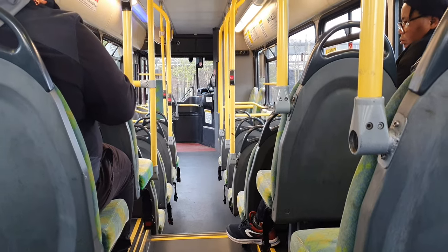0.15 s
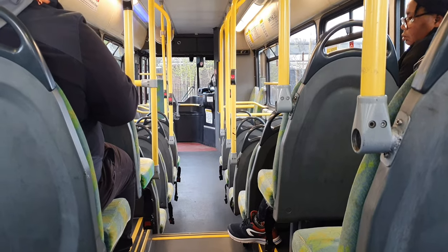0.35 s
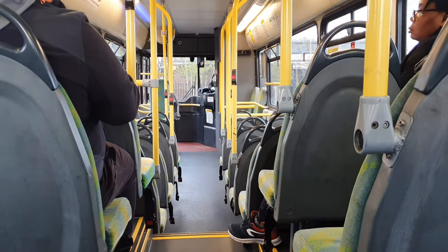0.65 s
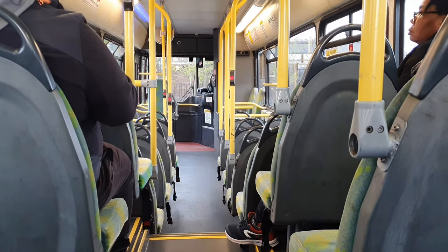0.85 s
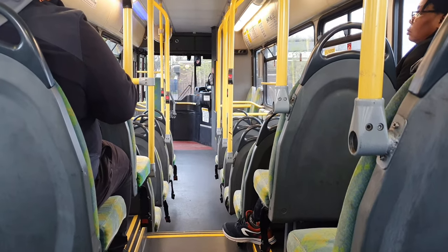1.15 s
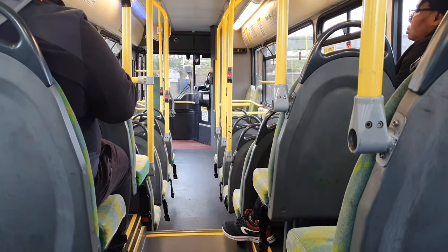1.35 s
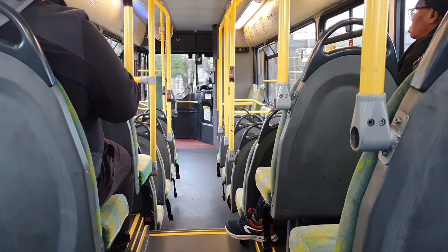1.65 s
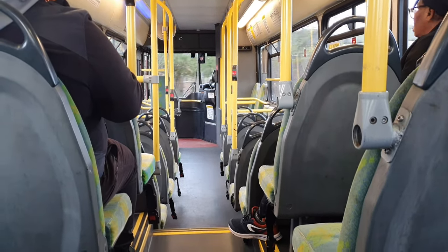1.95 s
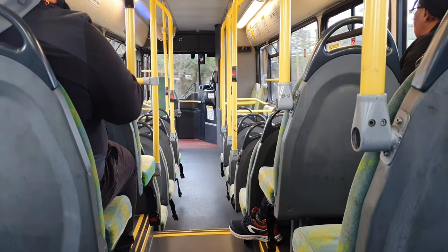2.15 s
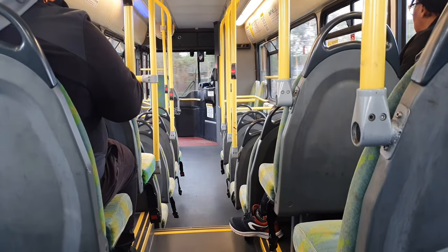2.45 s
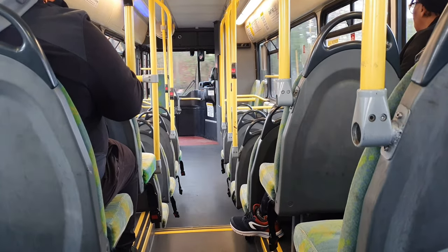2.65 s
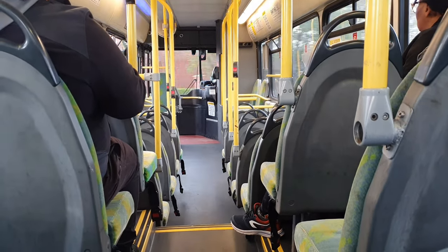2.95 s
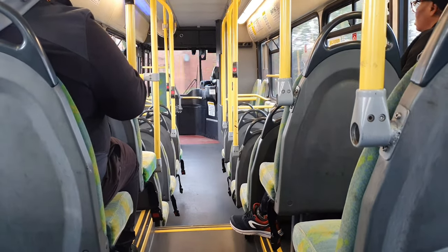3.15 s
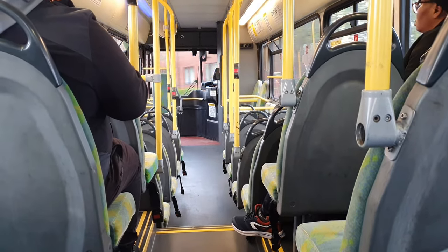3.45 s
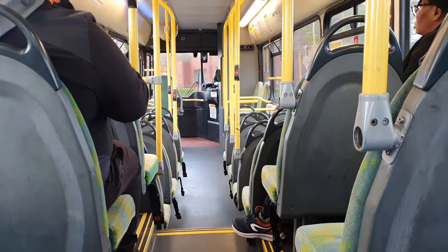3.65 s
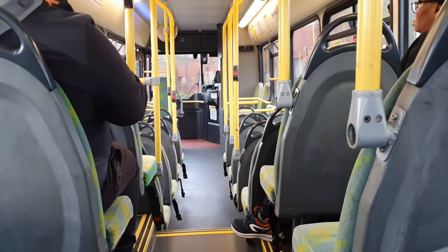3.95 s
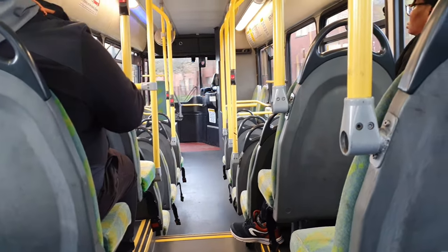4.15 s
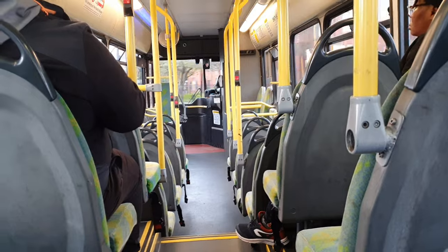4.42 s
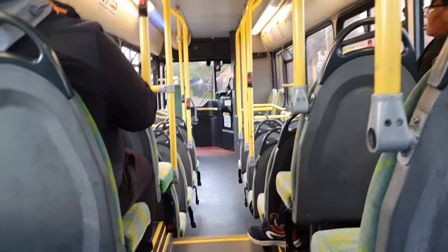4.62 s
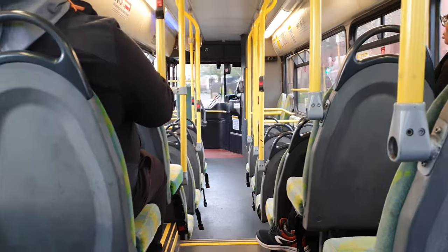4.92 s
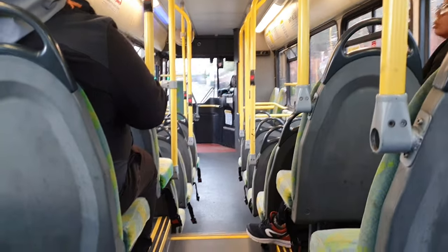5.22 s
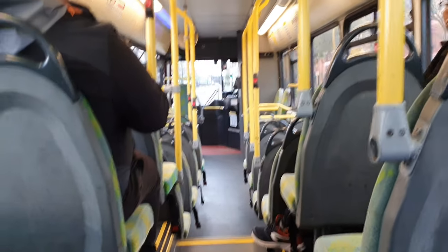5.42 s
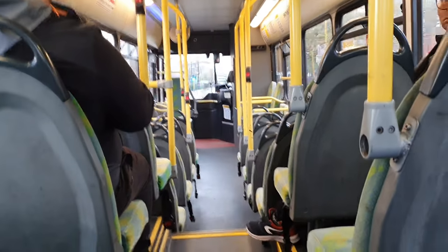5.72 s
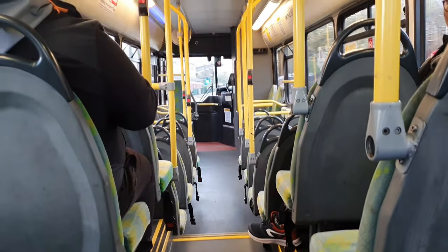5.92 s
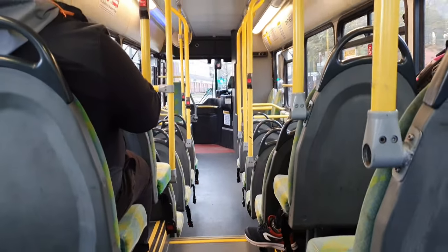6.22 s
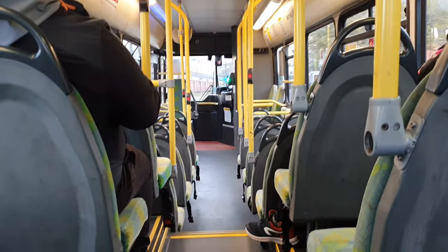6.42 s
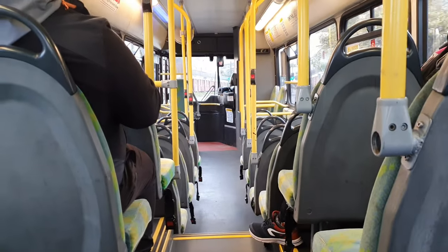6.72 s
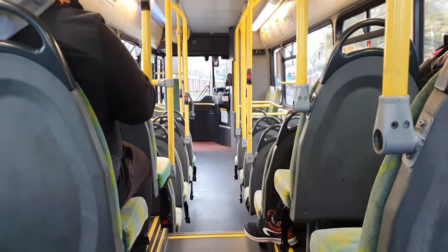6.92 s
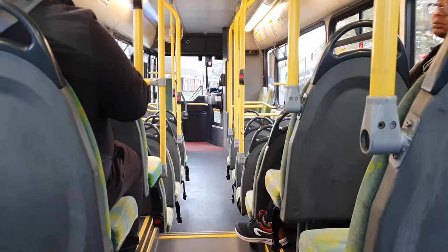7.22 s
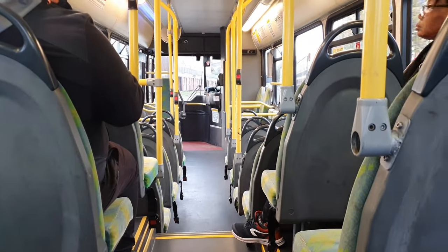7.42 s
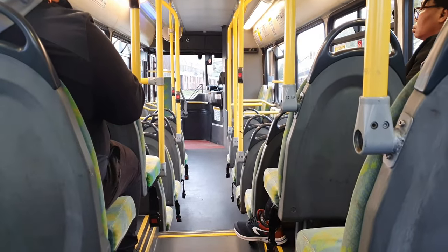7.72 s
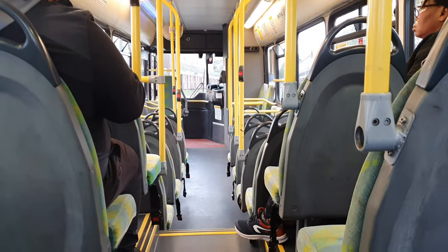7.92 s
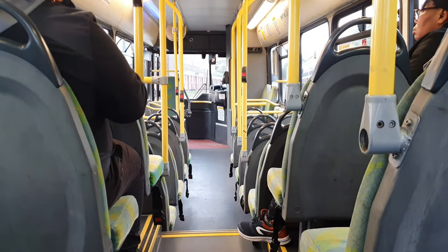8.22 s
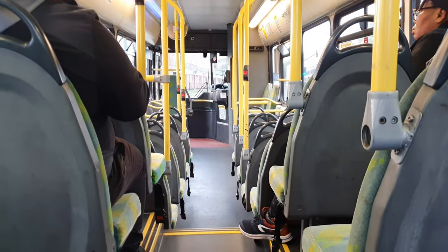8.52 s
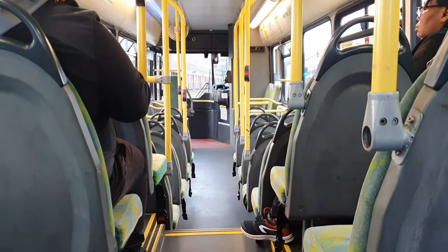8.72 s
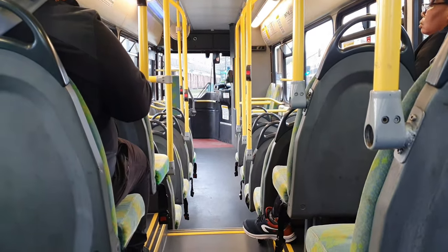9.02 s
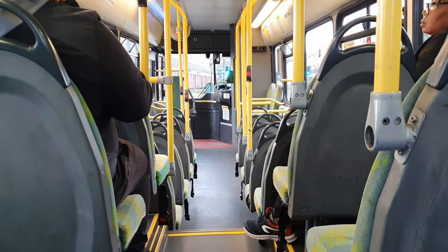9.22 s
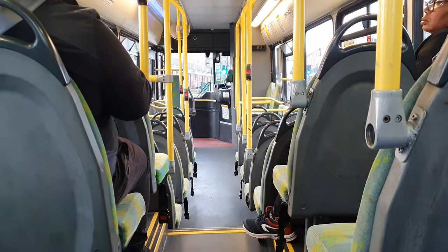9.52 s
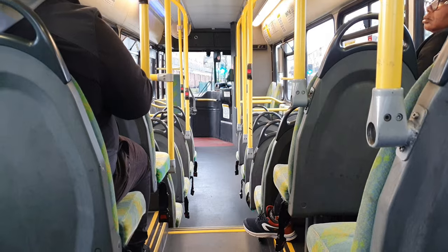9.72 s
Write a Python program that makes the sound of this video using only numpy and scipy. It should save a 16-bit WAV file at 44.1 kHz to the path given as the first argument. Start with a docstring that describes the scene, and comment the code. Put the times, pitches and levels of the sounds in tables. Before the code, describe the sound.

A diesel bus is heard from inside the cabin, close to the engine. Right at the start it pulls away, its deep drone rising quickly over the first second, with knocking, light valve ticking and a thin gear whine above continuous road rumble. The pitch holds until about 2.7 seconds, then climbs again to a peak near 4.4 seconds, making the cabin boom. The bus then cruises, the engine softening a little, with a very faint high turbo whistle. At about 5.8 seconds there is a low bump and a loose fitting chatters briefly on the left. Small ticks from trim and rails are scattered throughout. Around 8 seconds the engine eases off and its pitch falls, then it revs up again by 9 seconds. Another low bump follows, and the engine settles slightly lower with a clearer whine until about 10 seconds.

```python
"""Riding in a diesel bus

Near its six-cylinder engine, we hear a bus pull away, hold its speed, ease off and pick up again.
The firing makes the cabin boom. Cylinders knock, valves tap and gears whine in step with the revs
(the engine's speed), over the rumble of the road. A faint turbo whistles and loose fittings rattle."""
import sys
import numpy as np
from scipy import signal
from scipy.fft import rfft, irfft
from scipy.io import wavfile
from scipy.ndimage import uniform_filter1d

SR = 44100
rng = np.random.default_rng(int(sys.argv[2]) if len(sys.argv) > 2 else 0)


def transcribe(u):
    """Save the signal u as a 16-bit wav file named by the first command-line argument.

    u: samples, shape (n,) or (channels, n), limited to [-1, 1]; the rate is SR.
    q: integer samples, one column per channel.
    """
    v = np.clip(np.atleast_2d(u).T, -1, 1)
    q = np.round(v * 32767).astype(np.int16)
    wavfile.write(sys.argv[1], SR, q)


N = 434812
T = np.arange(N) / SR

# how hard the engine pulls: (time [s], level against full pull [dB])
LOAD = [(0.0, -15.5), (0.14, 0.3), (0.3, -1.5), (0.48, -0.6), (1.25, 0.8), (1.9, -0.4), (2.85, -1.5),
        (3.1, 1.8), (4.5, -1), (5.7, -3), (6.2, -6), (7.1, -5.5), (7.9, -1.5), (8.25, -17), (8.8, -11),
        (9.15, -1), (9.86, -1.1)]
# how the two sides differ: (frequency [Hz], likeness [0-1], left's lead [rad], left minus right [dB])
STEREO = [(45, 1, -0.94, 0.5), (74, 0.9, 0.63, -3.5), (87, 0.88, 0.94, 0.5), (96, 1, 0.54, 1.1),
          (190, 0.99, 0.19, 1), (300, 0.95, 0.09, 2.5), (450, 0.47, 0.44, 1.5), (556, 0.1, 1, 4.5),
          (1190, 0.1, 1.5, 2.5), (1600, 0.66, 2.5, 1.5), (2500, 0.2, 1, 6), (4150, 0, 0, 10),
          (8000, 0.43, 2.5, 4), (15000, 0.4, -2, 3)]


def drone(firings, hz, firing_db=-22.0, octave_db=-25.5):
    """The firing hums with many overtones, which swell as the revs carry them through a cabin boom."""
    # booms and dead spots of the cabin: (frequency [Hz], width [Hz], lift [dB])
    booms = [(42.6, 5.4, 7.5), (66, 6, 5), (96.4, 36, 5.5), (145, 12, 6.5), (149.9, 5.2, -10),
             (198, 15.4, 10.5), (307, 14, 10.5), (356.4, 27, 6.5), (552, 66, 6.5), (856, 220, 6.5),
             (1110, 390, -4)]
    # weaker tones of shafts and belts:
    # (multiple of the firing rate, level [dB], change per octave of revs [dB], boom strength [factor])
    overtones = [(0.6667, -40, -7, 2.5), (2.2, -30, -11, .1), (2.6667, -39, -12, .3), (2.75, -34.5, 19, .3),
                 (3, -41, -24, 1.4), (4, -41, -12, .9), (4.125, -42, -16, .4), (4.3333, -46, 3, .3),
                 (5, -49, -14, 1.8), (5.3333, -49, -6, .6), (5.6667, -49, 10, .7), (6, -48, -13, .6),
                 (7, -52, -12, 1), (7.3333, -57, -22, 1), (8, -52, 10, 1), (10, -59, -8, 1),
                 (11, -60, -12, .6), (12, -51, -7, 1), (30, -65, -14, 0)]
    load_db, = curves(LOAD)
    coasting, revs, labouring = engine_state(hz)
    rev_change = abs(uniform_filter1d(np.gradient(hz, T), size=6000))
    dip_db = -5 * uniform_filter1d(np.tanh(rev_change / 30), size=12000)  # fast change dims the octave
    out = tone(firings, hz, firing_db + load_db + lift(booms, hz), flutter=0.088, flutter_hz=2.0)
    level_db = octave_db + load_db + lift(booms, 2 * hz) + dip_db
    out += tone(2 * firings, 2 * hz, level_db, flutter=0.081, flutter_hz=9.3)
    effort_db = 0.8 - 12 * coasting - 8 * labouring
    for multiple, db, rise_db, strength in overtones:
        boom_db = strength * np.interp(T, T[::100], lift(booms, multiple * hz[::100]))
        level_db = db + rise_db * revs + effort_db + boom_db
        shake = min(.22 + .018 * multiple, .8)  # uneven running shakes the higher tones more
        cycles = multiple * firings + rng.random()
        out += tone(cycles, multiple * hz, level_db, flutter=shake, flutter_hz=3 + .45 * multiple)
    return out


def knock(firings, cylinders=6, ring_s=0.089, jitter_s=.00007, uneven_db=1.2):
    """Each cylinder in turn strikes the engine block and rings it in its own way."""
    fired_s = T[1:][np.diff(np.floor(firings)) > 0]
    slip, force = rng.standard_normal((len(fired_s), 2)).T
    at = np.clip((fired_s + jitter_s * slip) * SR, 0, N - 1).astype(int)
    t, out = T[:SR // 6], np.zeros((2, N))
    for cylinder in range(cylinders):
        blows = np.zeros(N)
        blows[at[cylinder::cylinders]] = amp(uneven_db * force[cylinder::cylinders])
        ring = rng.standard_normal((2, len(t))) * amp(-60 * t / ring_s)
        out += signal.oaconvolve(blows[None], ring, axes=1)[:, :N]
    return unit(out)


def valves(firings, hz, tight_db=-8, uneven_db=3, fade_above_hz=88):
    """Valves tap the engine cover, a slack one in six hardest; coasting or high revs soften them."""
    # the cover's ringing notes: (pitch [Hz], level [dB], time to fade by 60 dB [s])
    cover = [(1515, -2, 0.073), (1562, 0.5, 0.049), (1560, -8.5, 0.098)]
    at = np.flatnonzero(np.diff(np.floor(firings)) > 0)
    force, slip = rng.standard_normal((len(at), 2)).T
    is_tight = np.arange(len(at)) % 6 > 0
    taps = np.zeros(N)
    taps[np.clip(at + (20 * slip).astype(int), 0, N - 1)] = amp(uneven_db * force + tight_db * is_tight)
    t = T[:SR // 4]
    lag, side = np.array([[0], [2.1]]), np.array([[1], [.7]])  # the right side is later and softer
    ring = sum(amp(db - 60 * t / fade_s) * np.sin(2 * np.pi * (pitch * t + rng.random()) - lag)
               for pitch, db, fade_s in cover)
    ring = side * ring * (1 - np.exp(-t / 0.0037))  # the cabin takes a moment to fill
    coasting = engine_state(hz)[0]
    level_db = -44 - 10 * coasting - .5 * np.maximum(hz - fade_above_hz, 0)
    return unit(signal.oaconvolve(taps[None], ring, axes=1)[:, :N]) * amp(level_db)


def gears(firings, hz, coarse=24, fine=36, swell_db=0.7):
    """Two sets of timing gears whine as their teeth meet, 24 and 36 times a firing."""
    # whine of the coarse gears: (time [s], level [dB])
    whine = [(.15, -62), (.5, -44), (1.05, -49), (1.45, -44), (2.6, -45), (3.0, -50), (3.36, -38),
             (3.9, -45), (4.35, -41.5), (5, -54), (6.8, -55), (7.55, -43), (8.15, -49), (8.42, -64),
             (8.66, -44.5), (9.05, -42), (9.25, -44), (9.45, -38.5), (9.86, -38.5)]
    # ring of the gear housing, which the fine gears sweep through: (frequency [Hz], width [Hz], lift [dB])
    housing = [(2260, 480, 19)]
    crank = 2 * np.pi * firings / 3
    sway = .4 * (np.sin(crank) + np.sin(crank / 2)) / (2 * np.pi)  # the crankshaft turns unevenly
    out = tone(coarse * firings + sway, coarse * hz, curves(whine)[0], flutter=.45, flutter_hz=24)
    fine_db = -67 + lift(housing, fine * hz)
    out += tone(fine * firings + sway, fine * hz, fine_db, flutter=0.89, flutter_hz=41)
    return out * amp(swell_db * wander(7))


def cabin(firings, firing_hz, throb=0.057, shimmer_db=0.8):
    """Knock and the rushing noise of engine and road reach the seats through floor and panels."""
    # how much of the noise is knock: (frequency [Hz], share [0-1])
    knock_share = [(130, .05), (300, .45), (550, .42), (850, .2), (1500, .2), (7000, .12)]
    # tone colour of the noise in the cabin: (frequency [Hz], level in a 1 Hz band [dB])
    colour = [(15, -71), (40, -49.5), (100, -49), (190, -48), (300, -56), (450, -60), (700, -68),
              (1200, -73.5), (2600, -78), (4700, -87), (6700, -92.5), (7800, -101.6), (12000, -99),
              (15500, -103.6)]
    # ringing panels: (frequency [Hz], width [Hz], lift [dB])
    panels = [(73, 5, 1), (473, 55, 0.5), (564, 12, 2), (736, 50, -7.5), (774, 18, 6), (780, 260, 1.5),
              (1070, 280, -2), (1558, 95, 6.5), (2335, 220, 2.5), (3460, 580, 2.5), (4550, 250, 2.5)]
    rush = rng.standard_normal((2, N)) * (1 + throb * np.cos(2 * np.pi * firings))
    rush = unit(rush * amp(shimmer_db * wander(22)))
    frames = dict(fs=SR, nperseg=4096, noverlap=3072)
    hz, t, (rushing, knocking) = signal.stft(np.array([rush, knock(firings)]), **frames)
    share = spectra(knock_share, hz)[0][:, None]
    left, other = np.sqrt(1 - share) * rushing + np.sqrt(share) * knocking
    same, lead, tilt_db = (c[:, None] for c in spectra(STEREO, hz))
    right = (same * left + np.sqrt(1 - same ** 2) * other) * np.exp(-1j * lead)
    pair = np.array([left * amp(tilt_db), right]) * np.sqrt(2 / (1 + amp(tilt_db) ** 2))
    colour_db = spectra(colour, hz)[0] + lift(panels, hz)
    pair *= amp(colour_db[:, None] + noise_swell(firing_hz, hz, t)) * np.sqrt(SR / 2)
    return signal.istft(pair, **frames)[1][:, :N]


def noise_swell(firing_hz, hz, t, hiss_hz=4000):
    """Decibels added to the cabin noise by frequency and time, as pull, revs and road bumps change it."""
    # rumble, drumming and clatter: (centre [Hz], lift at full pull [dB], change when coasting [dB],
    # change per octave of revs [dB], change per octave of labouring [dB])
    bands = [(50, 2.5, 3.5, -2, 7.5), (203, -0.35, 1, 0.5, 0), (900, 1.7, -7.5, 1, 0.5)]
    # bumps in the road: (time [s], lift [dB], half-length [s])
    bumps = [(.16, 2, 0.12), (0.517, -6, 0.07), (1.1, 4, .1), (4.498, 5, .3), (5.767, 11, 0.058),
             (9.164, 10.5, 0.15)]
    # the hiss above the clatter: (time [s], lift [dB])
    hiss = [(0, -7.5), (.35, 1), (.6, -1), (2.5, -4), (3.6, 1.5), (5.75, 1.5), (6.15, -1.3), (7.1, -2),
            (7.6, 0), (8.15, -2.5), (8.55, -5.5), (9.25, 0), (9.86, 0)]
    coasting, revs, labouring = engine_state(np.interp(t, T, firing_hz), t)
    rumble, drumming, clatter = (db + coast_db * coasting + rise_db * revs + labour_db * labouring
                                 for _, db, coast_db, rise_db, labour_db in bands)
    rumble += sum(db * np.exp(-((t - s) / length) ** 2) for s, db, length in bumps)
    levels = [rumble, drumming, clatter, curves(hiss, t)[0]]
    centres = np.log([band[0] for band in bands] + [hiss_hz])
    blends = [np.interp(np.log(hz + 1), centres, band) for band in np.eye(len(levels))]
    return sum(np.outer(blend, level) for blend, level in zip(blends, levels))


def fittings():
    """A loose fitting chatters, and trim and rails tick, mostly on the left."""
    # the chatter and the ticks, each: (start [s], level [dB], length [s])
    chatter = [(5.774, -41, .06), (5.838, -45, .07), (5.916, -48, .03), (5.974, -37, .045)]
    ticks = [(.318, -54, .04), (.39, -56, .04), (.6, -54, .04), (1.238, -59, .03), (2.73, -59, .05),
             (3.324, -56, 0.027), (5.297, -56, .09), (6.655, -53, .025), (7.66, -60, .04), (8.11, -60, .04),
             (8.57, -54, .03), (9, -58, .03), (9.277, -54, .035)]
    # their tone colours, each: (frequency [Hz], level [dB])
    chatter_colour = [(1500, -30), (3200, -6), (3800, -1), (4900, 0), (5600, -11), (8000, -24),
                      (12000, -26), (16000, -30)]
    tick_colour = [(2000, -16), (5000, 5), (8000, -24), (11500, 13), (16000, 1)]
    return rattle(chatter, chatter_colour, left_db=15.0) + rattle(ticks, tick_colour, left_db=10.0)


def rattle(bursts, colour, left_db, rise_s=.003, grit_db=1.2):
    """Bursts of tiny collisions rise fast and die away."""
    envelope = np.zeros(N)
    for start, db, length in bursts:
        age = np.maximum(T - start, 0)
        envelope += amp(db) * (1 - np.exp(-age / rise_s)) * np.exp(-2 * age / length)
    gain = amp(spectra(colour, np.fft.rfftfreq(N, 1 / SR))[0])
    grains = rng.standard_normal((2, N)) * amp(grit_db * wander(250))
    return unit(irfft(rfft(grains) * gain, N)) * envelope * amp([[left_db / 2], [-left_db / 2]])


def turbo():
    """The turbo's spinning blades make two thin, unsteady whistles."""
    # one while cruising, one as the turbo slows, each: (time [s], pitch [Hz], level [dB])
    cruising = [(4.6, 9700, -93), (4.9, 10300, -84), (5.5, 11100, -75), (5.9, 11350, -74),
                (7.3, 10970, -84), (7.8, 11130, -81), (8, 10900, -90), (8.3, 8500, -76)]
    slowing = [(8.2, 15800, -84), (8.35, 13900, -78), (8.55, 12400, -75), (8.75, 12000, -79),
               (9, 12000, -78), (9.2, 12500, -82)]
    out = np.zeros((2, N))
    for whistle in (cruising, slowing):
        hz, db = curves(whistle)
        sounding = (T > whistle[0][0]) & (T < whistle[-1][0])
        out += sounding * tone(np.cumsum(hz) / SR, hz, db, flutter=.8, flutter_hz=30)
    return out


def engine_state(hz, t=T, cruise_hz=90.3, labour_hz=66.8, racing_hz_per_s=74):
    """Coasting (0 at full pull, 1 with no fuel), revs (octaves over cruise), labouring (octaves too slow)."""
    speeding_up = np.maximum(np.gradient(hz, t), 0) / racing_hz_per_s
    coasting = (1 - amp(curves(LOAD, t)[0])) * np.exp(-speeding_up)  # revving up takes fuel too
    revs = np.log2(np.maximum(hz, labour_hz) / cruise_hz)
    labouring = np.log2(np.maximum(labour_hz / hz, 1))
    return coasting, revs, labouring


def tone(cycles, hz, db, flutter, flutter_hz):
    """A wavering stereo tone; low ones waver more alike on the two sides than high ones."""
    same, lead, tilt_db = (np.interp(T, T[::100], c) for c in spectra(STEREO, hz[::100]))
    shared, own = (wander(flutter_hz) + 1j * wander(flutter_hz) for _ in range(2))
    right_waver = same * shared + np.sqrt(1 - same ** 2) * own
    left = (1 + flutter * shared) * amp(tilt_db / 2)
    right = (1 + flutter * right_waver) * amp(-tilt_db / 2) * np.exp(-1j * lead)
    wave = (np.array([left, right]) * np.exp(2j * np.pi * cycles)).real
    return amp(db) * np.sqrt(2 / (1 + 2 * flutter ** 2)) * wave


def wander(rate):
    """A smooth random drift that changes about rate times a second."""
    hz = np.fft.rfftfreq(8192, 1 / 800)
    slow = irfft(rfft(rng.standard_normal(8192)) * np.exp(-(hz / rate) ** 2))
    return np.interp(T, np.arange(len(slow)) / 800, unit(slow))


def lift(peaks, hz):
    """Decibels that a set of peaks and dips adds at the frequencies hz."""
    return sum(db / (1 + (2 * (hz - centre) / width) ** 2) for centre, width, db in peaks)


def curves(table, t=T):
    """Every column of a time table, read at the times t."""
    times, *columns = np.transpose(table)
    return [np.interp(t, times, c) for c in columns]


def spectra(table, hz):
    """Every column of a frequency table, read at hz on a log scale."""
    points, *columns = np.transpose(table)
    return [np.interp(np.log(hz + 1), np.log(points + 1), c) for c in columns]


def amp(db):
    """Turns decibels into a gain."""
    return 10 ** (np.asarray(db) / 20)


def unit(x):
    """Scales a signal to an average (rms) size of 1."""
    return x / np.sqrt(np.mean(x ** 2) + 1e-20)


def scene():
    """One crankshaft sets the engine's pace, and its flywheel smooths each change of speed."""
    # engine speed: (time [s], firing rate [Hz])
    speed = [(0.0, 35.7), (0.15, 41.9), (0.33, 57.7), (0.57, 67.5), (0.96, 71.5), (1.76, 75.6),
             (2.67, 73.8), (3.4, 86.5), (3.99, 94.9), (4.39, 102.6), (4.73, 98.2), (4.97, 96.5),
             (6.15, 97.1), (6.92, 98.8), (7.9, 102.4), (8.22, 81.7), (8.46, 75.8), (8.87, 96.1),
             (9.06, 100.7), (9.36, 88.2), (9.56, 86.2), (9.86, 87.1)]
    hz = uniform_filter1d(curves(speed)[0], size=4851, mode="nearest")
    firings = np.cumsum(hz) / SR  # how many so far
    engine = drone(firings, hz) + gears(firings, hz) + valves(firings, hz) + turbo()
    return engine + fittings() + cabin(firings, hz)


def record(dry, edge_hz=15750):
    """Cuts off the very highest treble."""
    low_pass = signal.firwin(611, edge_hz, window=("kaiser", 9), fs=SR)
    return signal.oaconvolve(dry, low_pass[None], "same")


dry = scene()
out = record(dry)
transcribe(out)
```